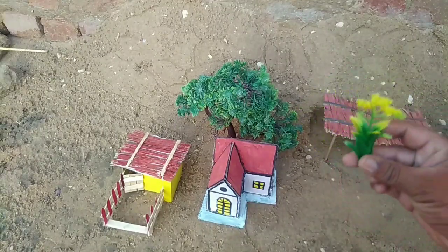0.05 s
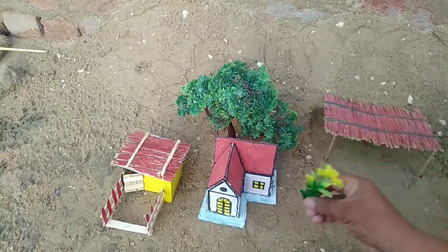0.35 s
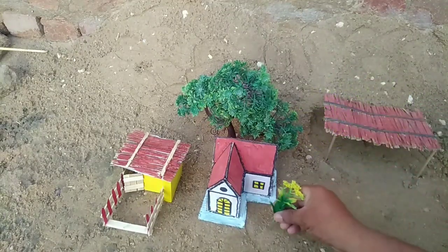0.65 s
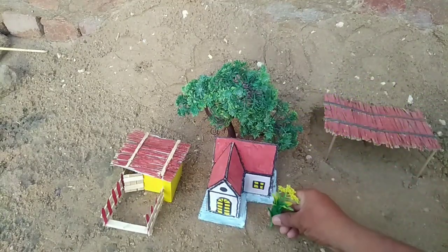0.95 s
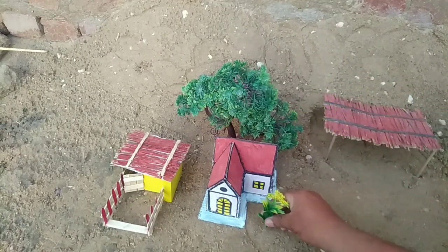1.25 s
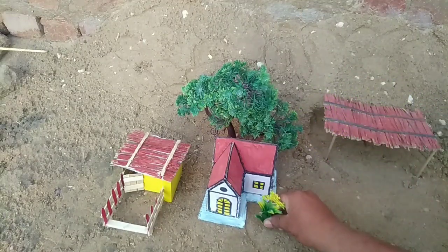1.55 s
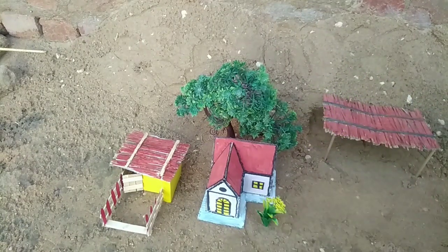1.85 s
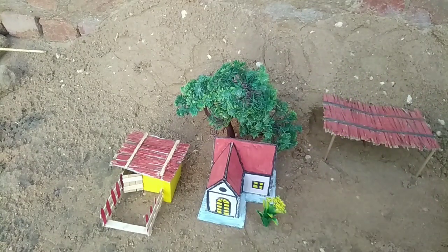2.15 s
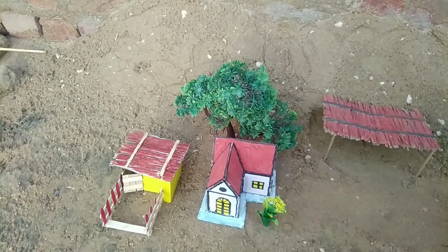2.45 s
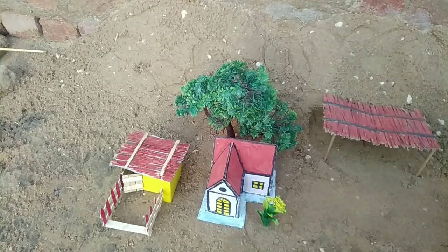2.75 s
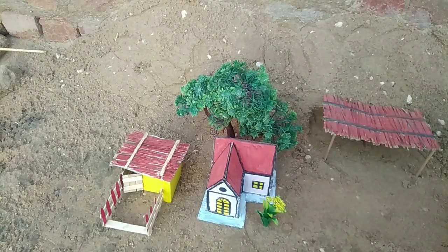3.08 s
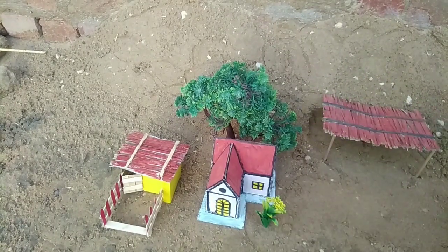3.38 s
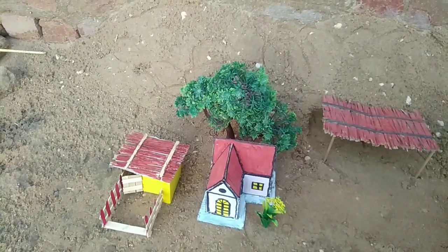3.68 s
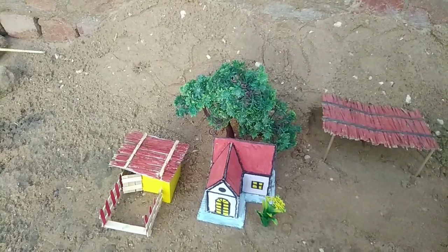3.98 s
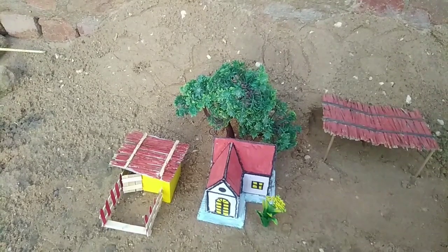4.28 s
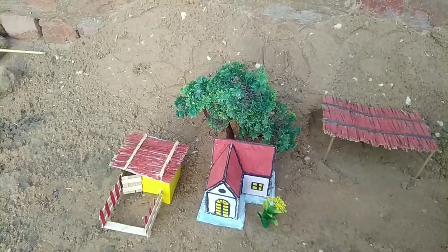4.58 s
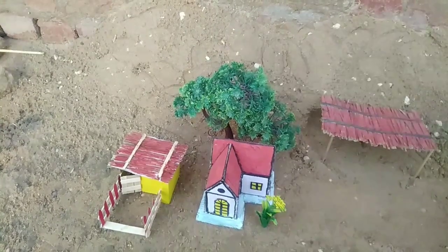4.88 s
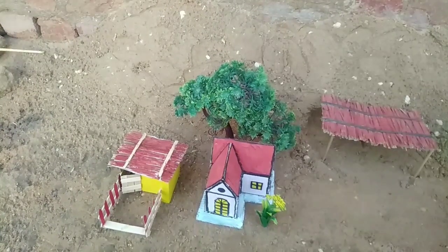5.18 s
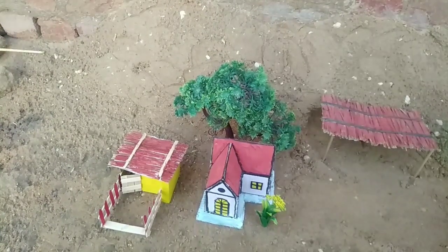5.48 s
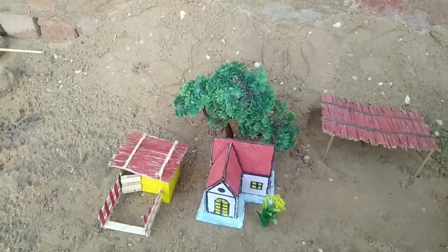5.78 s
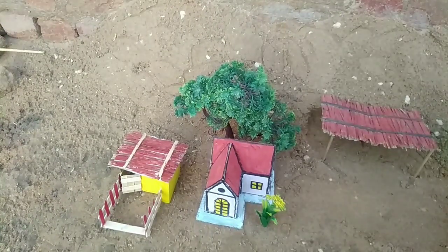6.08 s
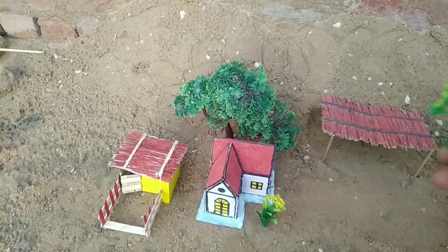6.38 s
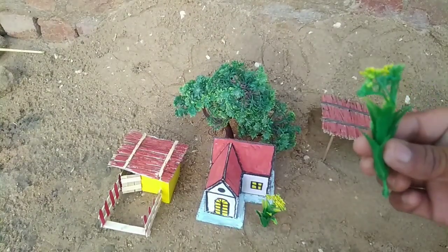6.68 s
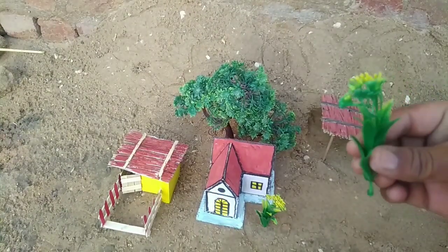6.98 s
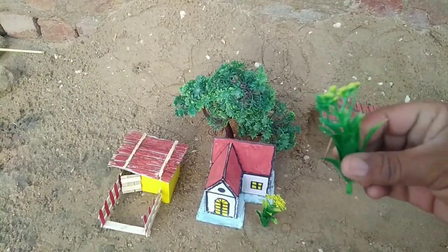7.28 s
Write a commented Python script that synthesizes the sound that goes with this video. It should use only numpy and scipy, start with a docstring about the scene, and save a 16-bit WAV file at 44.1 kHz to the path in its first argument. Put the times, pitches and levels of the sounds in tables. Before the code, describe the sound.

Outdoors in a yard, a nearby bird calls six times: right at the start, then at about 1.2, 2.5, 3.8, 5.0 and 6.3 seconds. Each call lasts under half a second, a clear whistle that breaks into a rasp, arches upward and drops. Each is higher and brighter than the last, and echoes briefly off walls and trees. A very faint, distant rooster crows in the first second. Small birds add thin chips and falling chirps throughout, with sharp high notes near 2.5 and 3.6 seconds. From about 4.5 to 7 seconds they grow busier, with rising sweeps and distant twittering. Faint, high insect trills come and go, strongest around 6 seconds, and a small dry snap sounds near 5.8. Light wind rumbles on the microphone in short gusts over a faint hiss, until the end at about 7.5 seconds.

```python
"""A koel calling across a yard

A koel calls six times, each call higher: a pure whistle that breaks into a rasp, arches and drops. Its voice
organ gives a clean tone when it vibrates steadily, and rasps and hisses when pushed too hard. Behind it small
birds sweep, chip and chatter, insects trill, and a rooster crows far off. Walls and trees echo them; light wind
rumbles on the microphone."""
import sys
import numpy as np
from scipy import signal
from scipy.fft import rfft, irfft
from scipy.io import wavfile

SR = 44100
rng = np.random.default_rng(int(sys.argv[2]) if len(sys.argv) > 2 else 0)


def unload_wav(signal):
    """Save mono or channel-first audio to the path in sys.argv[1] as 16-bit WAV at rate SR, clipped to [-1, 1]."""
    wavfile.write(
        sys.argv[1],
        SR,
        np.round(np.clip(np.atleast_2d(signal).T, -1, 1) * 32767).astype(np.int16),
    )


N = 332514
TIME = np.arange(N) / SR

# Shapes of three bird notes. Each row: seconds from the note's time, pitch multiplier, level change in dB.
FALL_SHAPE = [(-.012, 1.05, -28), (0, 1, -10.5), (.025, .93, -11.5), (.055, .77, -32)]  # a falling chirp
CHIP_SHAPE = [(-.012, 0.81, -23.5), (0, .95, -1.5), (.018, 1.03, 3), (0.036, 1, -13), (.05, 1, -28)]  # a thin chip
TSIP_SHAPE = [(-.03, 0.67, -29), (-.016, .82, -9.5), (-.006, .93, -3.5), (0, 1, 1), (.012, 1.01, 3.5),
              (.03, .9, -20), (.045, 0.7, -22)]  # a sharp "tsip" that rises, then dips


def undb(db):
    """Turn decibels into a volume multiplier."""
    return 10 ** (np.asarray(db) / 20)


def unit(x):
    """Scale a signal to an average power of 1."""
    return x / np.sqrt(np.mean(x ** 2))


def colour(x, points):
    """Shape the lows and highs of a sound along (Hz, dB) points; the result has power 1."""
    hz, db = np.transpose(points)
    bins = np.maximum(np.fft.rfftfreq(len(x), 1 / SR), 1)
    gain = undb(np.interp(np.log(bins), np.log(hz), db))
    return unit(irfft(rfft(x) * gain, len(x)))


def wander(count, rate_hz):
    """A smooth random wobble of typical size 1, mostly slower than rate_hz."""
    bins = np.fft.rfftfreq(count, 1 / SR)
    return unit(irfft(rfft(rng.standard_normal(count)) * np.exp(-(bins / rate_hz) ** 2), count))


def follow(table):
    """Return the times a table spans, and its other columns joined by straight lines."""
    s, *columns = np.transpose(table)
    t = np.arange(s[0], s[-1], 1 / SR)
    return [t] + [np.interp(t, s, c) for c in columns]


def phase_of(hz):
    """How far a vibration of changing pitch has turned; one cycle is 2 pi."""
    return 2 * np.pi * np.cumsum(hz) / SR


def sine(phase):
    """A pure tone of power 1."""
    return np.sqrt(2) * np.sin(phase)


def add(out, start, x):
    """Mix a sound in at its start time, with softened ends."""
    x = x * signal.windows.tukey(len(x), min(1, SR / 200 / len(x)))
    at = int(start * SR) + np.arange(len(x))
    inside = (at >= 0) & (at < N)
    out[at[inside]] += x[inside]


def echoes(x, t60, build_s, treble_db, patchy):
    """Up to a second of echoes off walls and leaves: they build, then fade 60 dB per t60 seconds."""
    t = TIME[:SR]
    scatter = rng.standard_normal(SR) * np.exp(patchy * wander(SR, 300))
    tail = colour(scatter, [(2000, 0), (12000, treble_db)])
    tail = tail * (1 - np.exp(-t / build_s)) * undb(-60 * t / t60)
    return signal.fftconvolve(x, tail / np.sqrt(np.sum(tail ** 2)))[:N]


def background_hiss(sway_db=1.2, flicker_db=4):
    """A faint background hiss, with a watery flicker added to its treble in narrow bands."""
    # The tone of the hiss. Each row: frequency in Hz, relative level in dB.
    hiss_colour = [(120, -22), (200, -3.5), (500, -8.5), (1000, -12.5), (2000, -18), (2700, -5),
                   (3200, -19), (4000, -9), (5200, -27), (6600, -24), (8300, -29.5), (9800, -17),
                   (12000, -34.5), (15400, -36.5)]
    hiss = colour(rng.standard_normal(N), hiss_colour) * undb(-78 + sway_db * wander(N, 1.8))
    spectrum, hz = rfft(hiss), np.fft.rfftfreq(N, 1 / SR)
    band = np.searchsorted(np.geomspace(1400, 8000, 14), hz)
    out = irfft(spectrum * (band == 0), N)
    for k in range(1, band.max() + 1):
        out += irfft(spectrum * (band == k), N) * undb(flicker_db * (wander(N, 25) - .5))
    return out


def wind(breeze_db=-68.5, sway_db=1.5):
    """A swaying breeze and short gusts rumble on the microphone."""
    # The tone of the rumble. Each row: frequency in Hz, relative level in dB.
    rumble_colour = [(20, -21), (35, -21.5), (62, -7.5), (78, 1), (100, -8.5), (122, -9), (150, -17),
                     (180, -23.5), (230, -37), (400, -68)]
    # Each row: strongest moment in seconds, length in seconds, level in dB.
    gusts = [(0.029, .1, -48), (0.313, .16, -51), (1.942, .16, -51), (2.325, .12, -53.5), (2.639, .16, -50),
             (3.191, .1, -58.5), (3.555, .1, -56.5), (3.977, .08, -55.5), (4.263, .16, -49.5),
             (5.048, .1, -57), (6.339, .18, -53.5)]
    breeze = undb(breeze_db + sway_db * wander(N, 7))
    gust_power = sum(undb(db) ** 2 / (1 + (2 * (TIME - s) / length) ** 2) ** 2 for s, length, db in gusts)
    return colour(rng.standard_normal(N), rumble_colour) * np.sqrt(breeze ** 2 + gust_power)


def chirps(notes, shape, waver):
    """A bird's gliding whistle, never quite the same, for each (seconds, Hz, dB) note."""
    out = np.zeros(N)
    t, glide, shape_db = follow(shape)
    for s, hz, db in notes:
        pitch = hz * glide * (1 + waver * wander(len(t), 250))
        add(out, s + t[0], sine(phase_of(pitch)) * undb(db + shape_db))
    return out


def far_calls(low_hz=1485.5, high_hz=4677.6, level_db=-80.5):
    """Short notes of larger birds far off, heard only through their echoes."""
    notes = [(when * N / SR, low_hz + (high_hz - low_hz) * height, 4.5 * np.log(strength))
             for when, height, strength in rng.random((70, 3))]
    voices = chirps(notes, CHIP_SHAPE, waver=.015)
    return unit(echoes(voices, t60=.6, build_s=.012, treble_db=-6.5, patchy=.2)) * undb(level_db)


def flock(quiet_db=-81, swell_db=20.5, loudest_s=5.6, swell_s=1.4):
    """Far small birds twitter at random, blurred by the trees; the sound swells once and calms again."""
    rising, falling = ([(when * N / SR, 3000 + 3800 * np.sqrt(height), 3 * np.log(strength))
                        for when, height, strength in rng.random((160, 3))] for _ in range(2))
    voices = chirps(rising, TSIP_SHAPE, waver=.041) + chirps(falling, FALL_SHAPE, waver=.04)
    db = quiet_db + swell_db * np.exp(-((TIME - loudest_s) / swell_s) ** 2)
    return unit(echoes(voices, t60=.41, build_s=.0042, treble_db=-12.5, patchy=.18)) * undb(db)


def hoots():
    """Two faint, low whistles far away."""
    # Each row: time in seconds, pitch in Hz, relative level in dB.
    notes = [(6.714, 600.6, -71.5), (6.754, 642.2, -92.5)]
    # One hoot. Each row: seconds from its peak, pitch multiplier, level change in dB.
    shape = [(-.025, 0.8594, -24), (0, 1, -10), (.015, .98, -34)]
    return chirps(notes, shape, waver=.027276)


def rooster(edge_s=.049):
    """A hoarse three-note crow, the last long and sagging; distance leaves only its two lowest tones."""
    # Each row: start and length in seconds, pitch and its sag in Hz, relative level in dB,
    # fade in dB, level of the octave above against the main tone in dB.
    notes = [(0.071, 0.12734, 568, 2.5, -75, 1, -21), (.41, 0.24176, 633.5, 32, -77, 6.5, -20.5),
             (0.657, 0.36, 614.6, 77.5, -65, 33, -16)]
    out = np.zeros(N)
    for start, length, hz, sag_hz, db, fade_db, octave_db in notes:
        t = TIME[:int(length * SR)]
        share = t / length
        phase = phase_of((hz - sag_hz * share ** 2) * (1 + .028 * wander(len(t), 90)))
        soft_ends = np.minimum(np.minimum(t, length - t) / edge_s, 1)
        volume = soft_ends * undb(db + 3 * wander(len(t), 20))
        tone = undb(-fade_db * share) * sine(phase)
        octave = undb(octave_db - .16 * fade_db * share) * sine(2 * phase)
        add(out, start, volume * (tone + octave))
    return out


def ticks(rise_s=.0052, t60=.1921):
    """Small dry snaps: bursts of bright noise that die quickly."""
    # Each row: time in seconds, relative level in dB.
    snaps = [(0.8444, -66), (3.4331, -66), (4.6563, -70), (4.9062, -60), (5.8396, -42)]
    out, t = np.zeros(N), TIME[:SR // 10]
    volume = np.minimum(t / rise_s, 1) ** 2 * undb(-6.5 - 60 * t / t60)
    for s, db in snaps:
        snap = colour(rng.standard_normal(len(t)), [(2000, -18.5), (6500, 21), (15000, .5)])
        add(out, s - rise_s, snap * volume * undb(db))
    return out


def insect_trills(pulses_per_s=49, swell_share=.42, edge_db=-14):
    """Fast runs of falling notes swell and fade: insects' trills, and near 6 s a small bird's chatter; the
    wider the fall, the more ragged pitch and pace."""
    # Each row: loudest moment and length in seconds, middle pitch in Hz,
    # swing above and below that pitch in Hz, relative level in dB.
    trills = [(0.876, 0.3856, 6501, 717.7, -75.5), (1.901, 1.3452, 7896, 100, -73.5),
              (2.197, 1.2683, 6998, 791.1, -72), (2.85, 0.5168, 7006, 295.3, -75),
              (3.608, .9, 7046, 200.8, -81), (4.332, 0.771, 6829, 893.8, -69.5),
              (5.875, .55, 7587, 1313, -59), (6.088, 0.5604, 7092, 999, -60.5),
              (7.117, 0.24212, 7456, 151.7, -73.5), (7.48, 0.3895, 6408, 790, -75)]
    out = np.zeros(N)
    for loudest, length, hz, swing_hz, db in trills:
        start = loudest - swell_share * length
        t, swell_db = follow([(start, edge_db), (loudest, 0), (start + length, edge_db)])
        pace = pulses_per_s * np.exp((.04 + .0003 * swing_hz) * wander(len(t), 30))
        beat = np.cumsum(pace) / SR % 1  # runs from 0 to 1 in each pulse
        middle_hz = hz * (1 + .0052 * wander(len(t), 310))
        pitch = middle_hz + swing_hz * (1 - 2 * beat + .11 * wander(len(t), 160))
        pulses = sine(phase_of(pitch)) * np.sin(np.pi * beat) ** 2
        add(out, start, pulses * undb(db + 10 + swell_db + 4.9 * wander(len(t), 28)))
    return out


def small_birds():
    """Small birds whistle rising sweeps, sharp tsips and falling chirps."""
    # Three kinds of note. Each row: time in seconds, pitch in Hz, relative level in dB.
    sweeps = [(4.565, 5622, -71), (4.65, 5740, -61.5), (4.815, 6000, -60.5), (5.005, 6400, -53),
              (5.765, 7127, -52.5), (6.205, 6816, -44.5), (6.345, 6934, -40.5), (6.508, 6823, -38.5),
              (6.856, 6296, -42)]
    tsips = [(2.492, 6403, -45.5), (3.641, 6509, -46.5), (4.736, 6428, -54.5), (4.912, 6302, -56.5)]
    falls = [(.49, 4360, -52), (.61, 4258, -57), (1.7, 4030, -57.5), (3.0, 4425, -55.5),
             (3.11, 4189, -57.5), (3.17, 3500, -58), (5.51, 5330, -44.5), (5.585, 5489, -42.5),
             (5.66, 4814, -45.5), (5.955, 3690, -59), (6.015, 5430, -56), (6.2, 3457, -51.5)]
    # One sweep. Each row: seconds from its steep climb, pitch multiplier, level change in dB.
    sweep_shape = [(-.07, .58, -35), (-.05, .63, -15), (-.025, .7, -11), (-.012, .79, -9), (0, .95, 0),
                   (.02, 1.05, -2), (.045, 1.06, -18)]
    return (chirps(sweeps, sweep_shape, waver=.022) + chirps(tsips, TSIP_SHAPE, waver=.021)
            + chirps(falls, FALL_SHAPE, waver=.025))


def chips(first_hz=10000, later_hz=9600.6, scatter=.026):
    """Thin high chips in twos and threes; the first of each group is softer and usually higher."""
    # Each row: start in seconds, spacing in seconds, number of chips, relative level in dB.
    groups = [(.4, 0.09458, 3, -66), (.865, 0.08111, 2, -68.5), (1.6, 0.08665, 2, -63.5),
              (2.06, 0.08706, 2, -68), (2.99, 0.10004, 2, -65.5), (3.45, 0.09425, 2, -70.5),
              (4.35, 0.13552, 2, -69), (4.73, .118, 3, -67), (5.68, .1, 2, -65.5), (6.15, 0.07753, 2, -66),
              (6.83, 0.07525, 2, -65)]
    notes = [(start + k * spacing, later_hz if k else first_hz, db if k else db - 1.5)
             for start, spacing, count, db in groups for k in range(count)]
    notes = [(s, hz * (1 + scatter * rng.standard_normal()), db) for s, hz, db in notes]
    return chirps(notes, CHIP_SHAPE, waver=.026)


def koel_effort(age, length, attack_s, held_hz, top_hz, held_db, arch_db,
                break_at, broken_for, broken_rasp_db, strain_db):
    """Tension in the voice sets the pitch; whistle, rasp and treble change level through the call."""
    # Each row: share of the call gone by, tension (0 at the held pitch, 1 at the top pitch).
    tension_curve = [(0, -.5), (.03, .08), (.07, .33), (.2, .08), (.35, 0), (.48, .1), (.58, .45),
                     (.68, .87), (.78, 0.99195), (.86, .75), (.9, .3), (.945, -.7), (1, -1.1)]
    share = age / length
    hz = held_hz + (top_hz - held_hz) * np.interp(share, *np.transpose(tension_curve))
    # Each stage of the call is 0 when absent and 1 at its fullest.
    catch_s, break_s, mend_s, slack_s = .017, .016, .029, .047
    catch = (age / catch_s * np.exp(1 - age / catch_s)) ** 2
    broken = np.clip(np.minimum((age - break_at) / break_s, (break_at + broken_for - age) / mend_s), 0, 1)
    arch = np.clip((share - .5) / .26, 0, 1)
    strain = np.exp(-((share - .79498) / .24) ** 2)
    slack = np.clip(1 - (length - age) / slack_s, 0, 1)
    whistle_db = held_db + (arch_db - held_db) * arch
    whistle_db -= 31 * np.exp(-age / attack_s) + 8 * broken + 19.5 * slack
    # The voice is rough as it catches, as it goes slack, and while it is broken.
    rasp = undb(-64.5) + undb(-54.5) * catch + undb(-50) * np.sin(np.pi * slack) ** 2
    rasp = np.maximum(rasp, broken * undb(broken_rasp_db - 19.5 * slack ** 2))
    treble_db = -54 - 37 * np.exp(-age / .017) + strain_db * strain - 3.5 * slack
    return hz, whistle_db, 20 * np.log10(rasp), treble_db


def koel_overtones(phase):
    """Tones at whole multiples of the pitch glide through the resonances of the open beak."""
    # Relative levels in dB at twice the pitch, three times the pitch, and so on.
    levels = [-10.5, -5.5, -12, -7, -6, -1, -3.5, -6.5, -12, -14]
    # The beak's resonances. Each row: frequency in Hz, boost or cut in dB.
    beak = [(3000, 1.5), (4500, -3), (5400, -5.5), (6300, 5.5), (7200, 7.5), (9000, -4.5), (11000, 1.5),
            (12800, -11), (14500, 0.5)]
    edge = phase + .11 * wander(len(phase), 290)  # each cycle's closing is less steady than the tone
    tones = sum(undb(db + 4 * wander(len(phase), 40)) * sine(k * edge) for k, db in enumerate(levels, 2))
    return colour(tones, beak)


def koel_rasp(hz, phase, rough, jitter=.17, shimmer_db=4):
    """Pushed too hard, the voice snaps shut in cycles of uneven length and force."""
    # The throat's resonances for a 1500 Hz call. Each row: frequency in Hz, boost or cut in dB.
    throat = [(500, -49.5), (750, -15), (880, -21), (1150, 1), (1500, -5), (1800, -5), (2400, -14),
              (2800, -21), (3500, -43.5)]
    count = len(hz)
    cycles = phase_of(hz * (1 + jitter * wander(count, 800))) // (2 * np.pi)
    snaps = np.diff(cycles, prepend=0) * undb(shimmer_db * wander(count, 810))
    tightened = np.array(throat) * [hz.mean() / 1500, 1]  # the throat tightens for higher calls
    # Strong and weak cycles alternate in fits, adding a tone at one and a half times the pitch.
    extra_tone = sine(1.5 * phase + .83 * wander(count, 250)) * undb(-6 + 1.1 * wander(count, 44))
    return undb(-1) * colour(snaps, tightened) + rough * extra_tone


def koel_treble(hz, phase, rough):
    """The overtones dissolve into hiss in the rasp, and as the membrane slackens in the final drop."""
    # The tone of the hiss. Each row: frequency in Hz, relative level in dB.
    hiss_colour = [(2000, -37.5), (3200, 0), (4500, 3), (6100, 11), (7000, 9.5), (8000, -1.5),
                   (9300, -11.5), (10800, 0), (12500, -4), (14500, -7), (16000, 4)]
    fall_speed = np.maximum(-np.gradient(np.log(hz)) * SR, 0)
    clear = (1 - rough) * np.exp(-(fall_speed / 8.5) ** 2)
    overtones = koel_overtones(phase)
    hiss = colour(rng.standard_normal(len(hz)) * undb(3.5 * wander(len(hz), 300)), hiss_colour)
    return np.sqrt(clear) * undb(-2) * overtones + np.sqrt(1 - clear) * undb(-1) * hiss


def koel():
    """Six calls from the bird's voice organ: a nearly pure whistle, with rasp and treble on top."""
    # Each row: start, length and swell time in seconds; held and top pitch in Hz; whistle level in dB
    # while held and in the arch; seconds until the voice breaks and seconds it stays broken;
    # rasp level in dB; extra treble at the top in dB.
    calls = [(-.12, 0.37737, .02, 1330, 1523, -26, -28.5, 0.1651, 0.09448, -41.5, 0),
             (1.152, 0.39478, 0.011165, 1393, 1630, -29, -34, 0.17875, 0.24802, -40.5, 2),
             (2.489, 0.4046, 0.013965, 1423, 1707, -26.5, -34.5, 0.20847, 0.11426, -39.5, 5.5),
             (3.792, 0.39564, 0.027395, 1482, 1781, -24.5, -36, 0.18278, 0.17, -38.5, 8.5),
             (5.017, .392, 0.02112, 1540, 1847, -30, -33, 0.16988, 0.08257, -38.5, 13),
             (6.283, 0.40279, 0.02971, 1576, 1906, -30.5, -31, .378, 0.02792, -44, 15.5)]
    out = np.zeros(N)
    for start, length, *settings in calls:
        age = TIME[:int(length * SR)]
        hz, whistle_db, rasp_db, treble_db = koel_effort(age, length, *settings)
        rough = 1 / (1 + undb(whistle_db - rasp_db) ** 2)  # 0 is all whistle, 1 is all rasp
        phase = phase_of(hz * (1 + .00071 * wander(len(age), 120)))
        phase += .34 * np.sqrt(rough) * wander(len(age), 430)  # roughness smears the tone
        whistle = sine(phase) * undb(whistle_db)
        rasp = koel_rasp(hz, phase, rough) * undb(rasp_db)
        treble = koel_treble(hz, phase, rough) * undb(treble_db)
        fade_out = np.minimum((age[-1] - age) / .015, 1)
        add(out, start, fade_out * (whistle + rasp + treble))
    return out


def scene():
    """The koel is nearest; it and the voices behind it echo off walls and trees."""
    call = koel()
    birds = small_birds() + chips()
    buzz = insect_trills()
    far = rooster() + hoots()
    walls = undb(1) * echoes(call, t60=.19653, build_s=.016, treble_db=4.5, patchy=.1)
    yard = undb(-11) * echoes(call, t60=.48, build_s=.03, treble_db=7, patchy=.4)
    trees = undb(-41) * echoes(call, t60=5.7, build_s=.053, treble_db=9, patchy=.23)
    birds = undb(-5) * birds + undb(-4.5) * echoes(birds, t60=.44, build_s=.0048, treble_db=-5, patchy=.35)
    buzz = undb(-5) * buzz + undb(-4) * echoes(buzz, t60=.75, build_s=.0064, treble_db=-5, patchy=.3)
    far = undb(12.5) * far + undb(2.5) * echoes(far, t60=.84, build_s=.0038, treble_db=-16.5, patchy=.11)
    background = flock() + far_calls() + ticks() + wind() + background_hiss()
    return (background + far + buzz + birds + call + walls + yard + trees)[None]


def record(dry, top_hz=15300):
    """The very highest treble is cut off steeply."""
    return signal.sosfilt(signal.ellip(10, .2, 80, top_hz, fs=SR, output="sos"), dry)


dry = scene()
out = record(dry)
unload_wav(out)
```